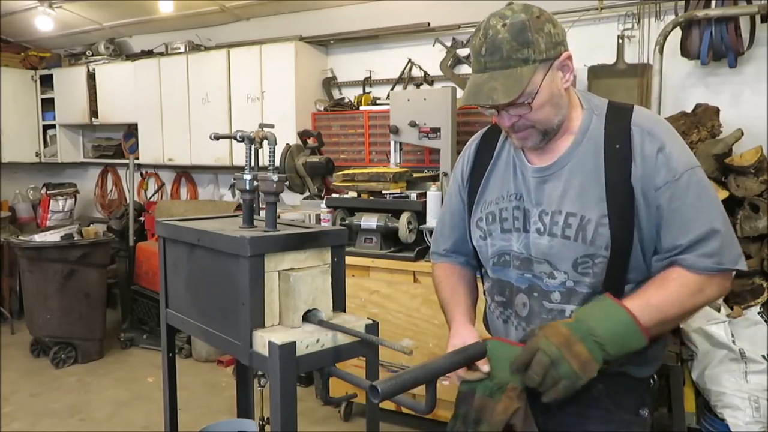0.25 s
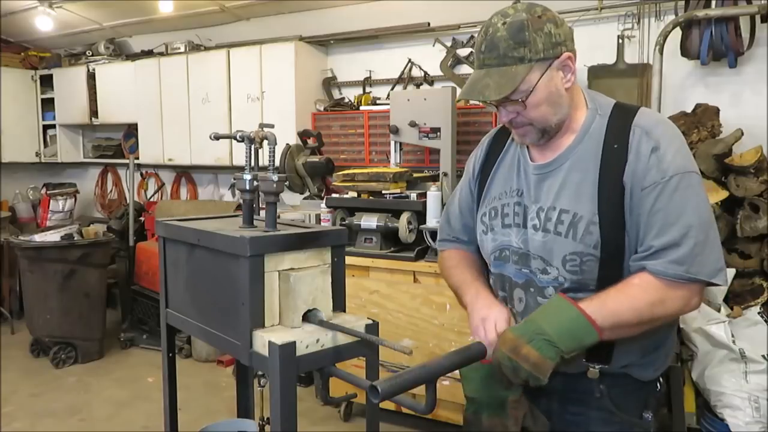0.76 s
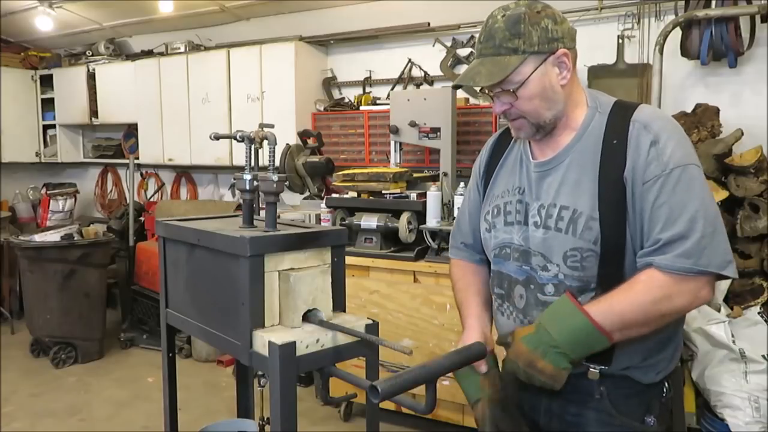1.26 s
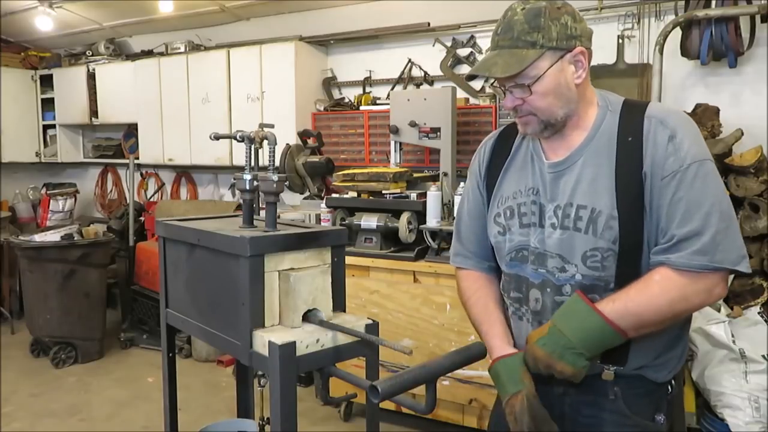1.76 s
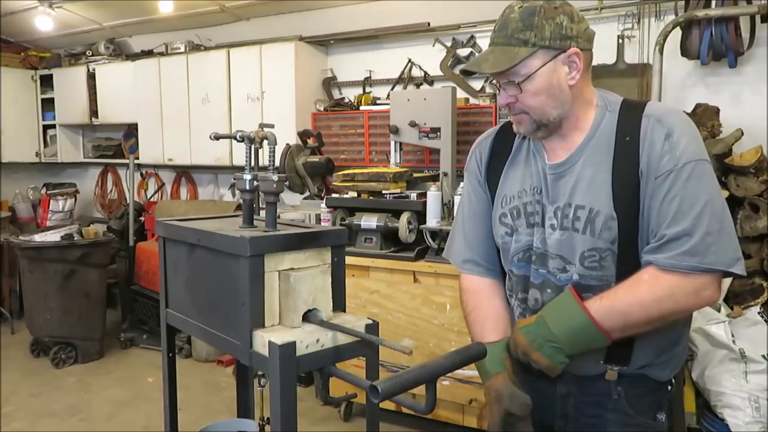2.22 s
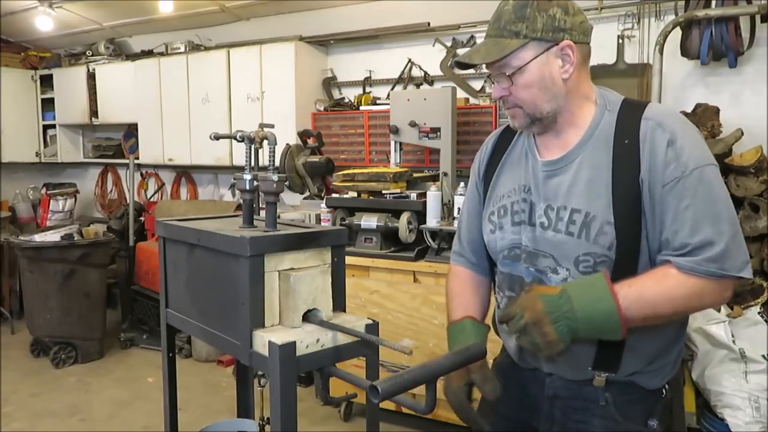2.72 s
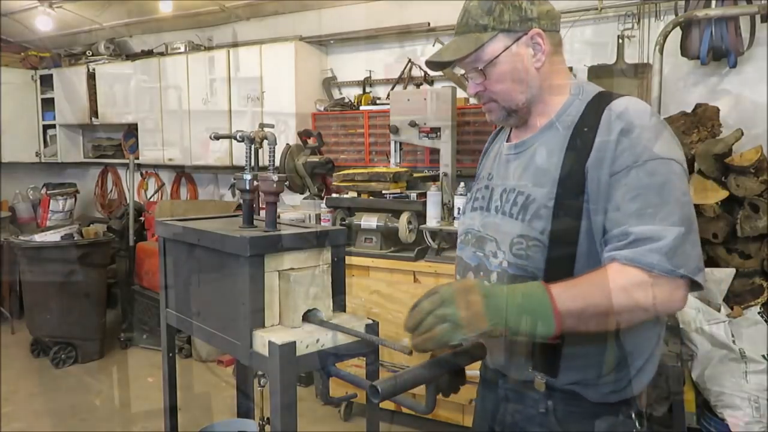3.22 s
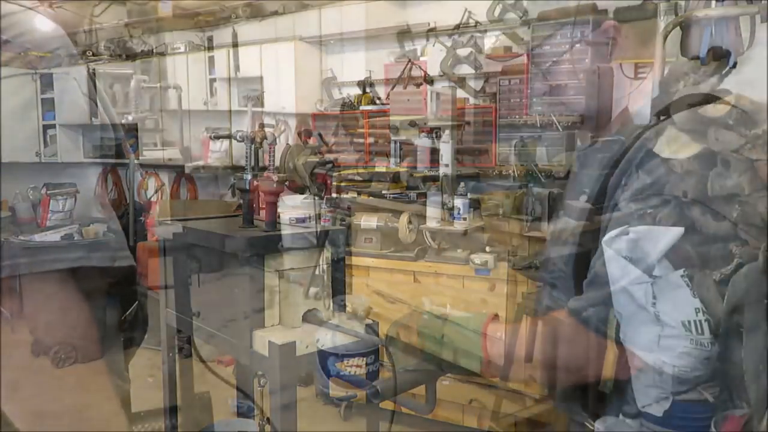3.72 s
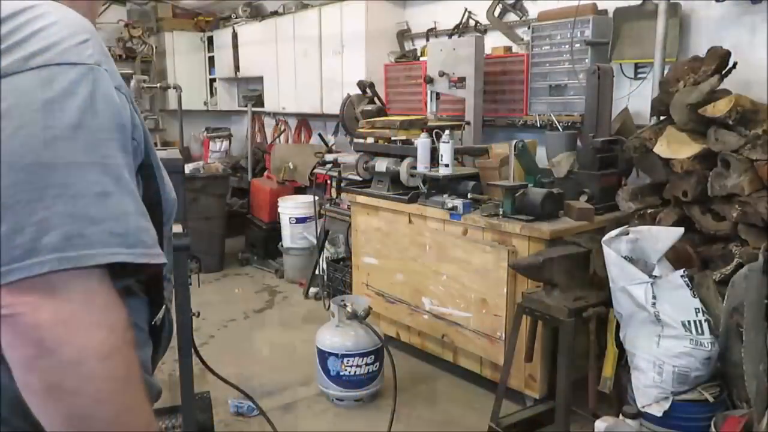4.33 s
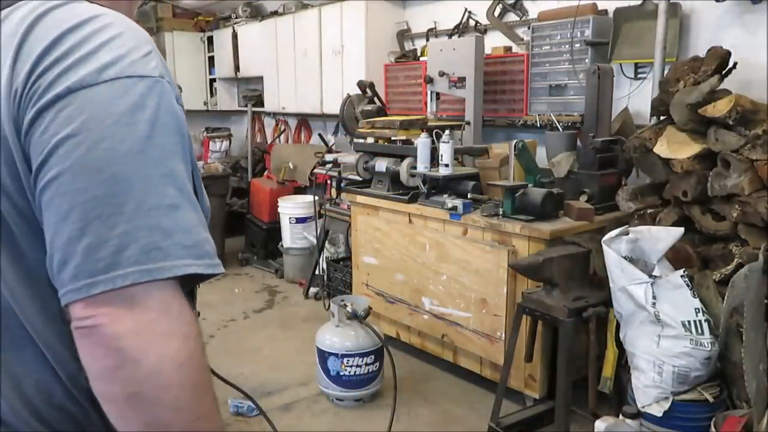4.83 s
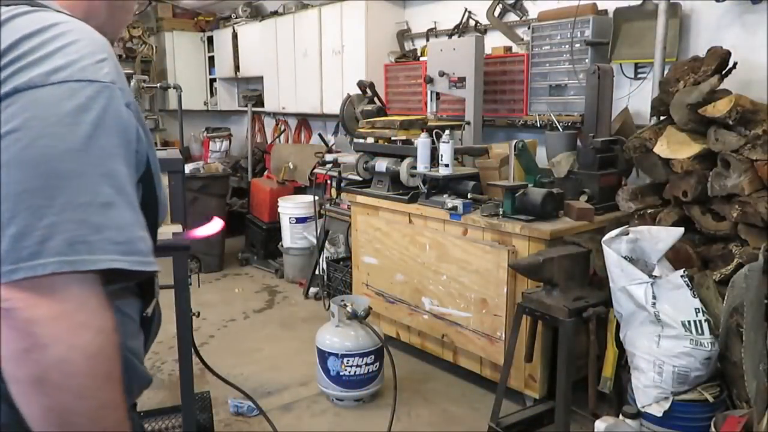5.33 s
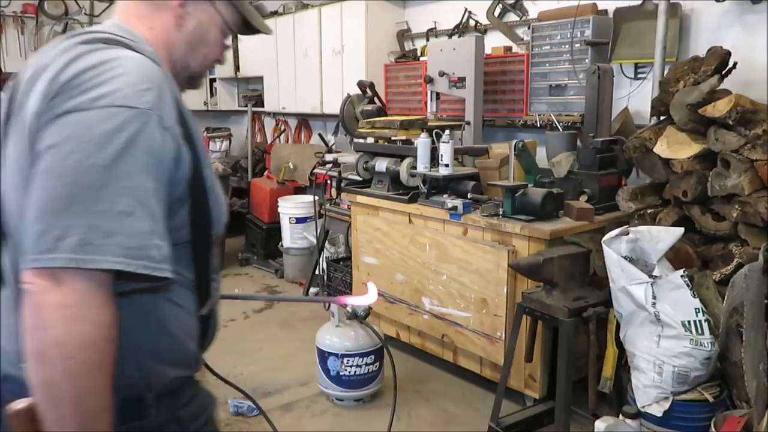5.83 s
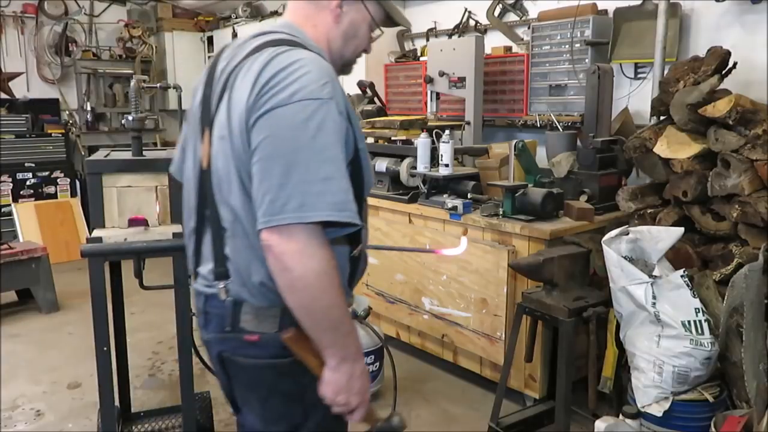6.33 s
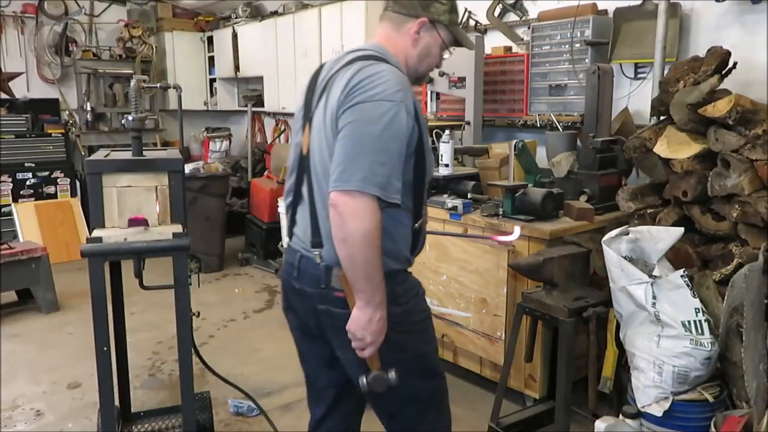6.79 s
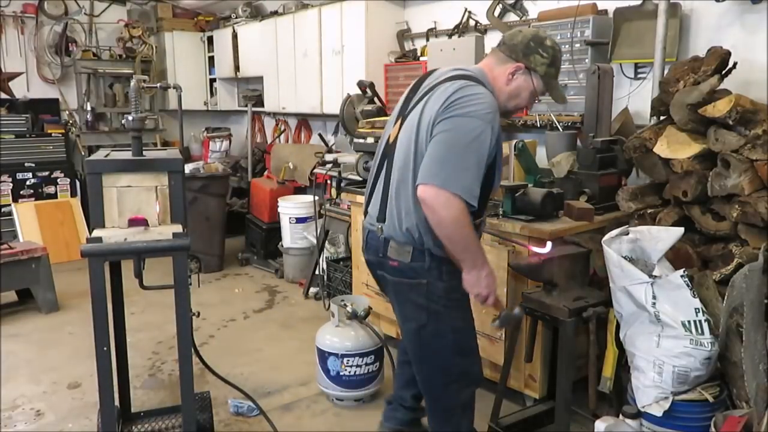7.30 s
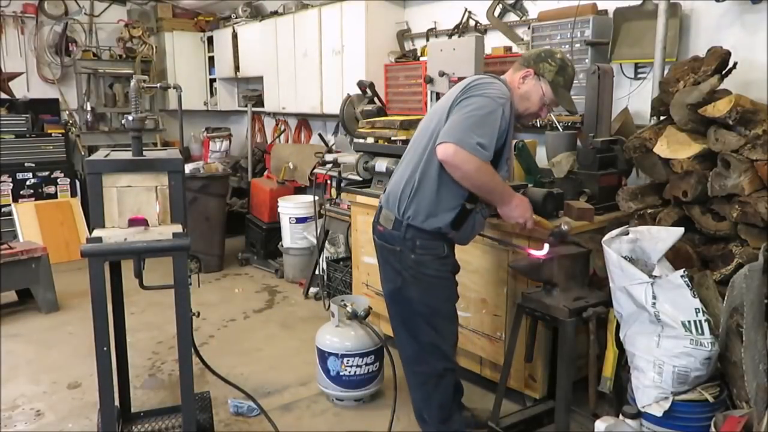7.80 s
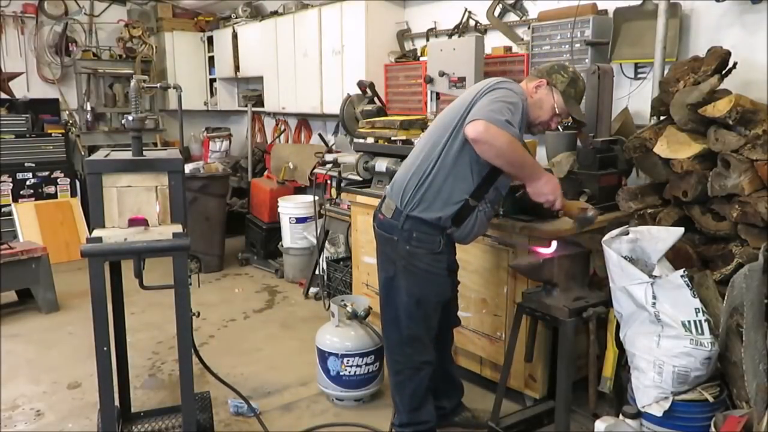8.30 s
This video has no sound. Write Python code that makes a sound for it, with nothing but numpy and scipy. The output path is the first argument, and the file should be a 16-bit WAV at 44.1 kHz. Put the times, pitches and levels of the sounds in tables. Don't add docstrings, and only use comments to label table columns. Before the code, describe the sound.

From 0 s a gas forge roars at full, steady strength in a workshop, heard by a small near-mono microphone with wider treble. With the door shut, a deep hollow boom around 200-300 Hz throbs in quick irregular flares, over bass rumble, dull burner-tube whistling and a thin high gas hiss that flutters in short puffs. At about 3.03 s a second view enters abruptly: the open chamber's broader, breathier roar, layered over the first. At 4.53 s the shut-door sound cuts out, taking its fine high hiss with it. The open flame continues to the end, rough and low-heavy, with faint wavering whistles and small changes in strength and brightness as a body passes. Around 7.5 s a bar touches metal, barely audible. Near 8.47 s comes a tiny tick, then at 8.49 s one hammer blow with an immediate bounce: a short, damped metallic crack, ending the scene.

```python
import sys
import numpy as np
from scipy import signal
from scipy.fft import rfft, irfft, next_fast_len
from scipy.io import wavfile
from scipy.ndimage import uniform_filter1d, minimum_filter1d, map_coordinates

SR = 44100
rng = np.random.default_rng(int(sys.argv[2]) if len(sys.argv) > 2 else 0)


def int16_out(signal):
    q = np.round(np.clip(np.atleast_2d(signal).T, -1, 1) * 32767)
    wavfile.write(sys.argv[1], SR, q.astype(np.int16))


def voltage_ratio(decibels):
    exponent = np.asarray(decibels, float) / 20
    return 10 ** exponent


N = 377055
PAD = next_fast_len(N + 8192)
HZ = np.maximum(np.arange(PAD // 2 + 1) * SR / PAD, 1)
LOG_HZ = np.log(HZ)
PUFF_REST_DB = -66.5

# start_s, roar_db, view_db (brightness through a clear mouth)
OPEN_FLAME = [(3.05, -33.5, 0.1), (3.56, -28, -0.5), (3.59, -33, 0.5), (4.33, -29.5, -0.4),
              (4.48, -33, 0.1), (5.2, -29, 0.4), (5.23, -32.5, 0.8), (5.29, -29, -0.2), (5.54, -33, 0),
              (6.12, -32, 0.9), (6.4, -27.5, -0.4), (6.91, -32, 0.9), (6.99, -34, 0.5), (7.16, -32.5, 0.1),
              (7.46, -31.5, 1), (7.7, -29.5, -0.2), (8.16, -31, 1), (8.45, -29, 0.7)]
# pitch_hz, side_minus_mid_db
SHUT_WIDTH = [(60, -44), (110, -59), (200, -33.5), (380, -30), (700, -31.5), (1290, -23), (2380, -21),
              (4400, -10.5), (8120, -4), (15000, 4.5)]
# pitch_hz, side_minus_mid_db
OPEN_WIDTH = [(60, -33.5), (110, -45.5), (200, -36), (380, -23.5), (700, -26), (1290, -20.5), (2380, -14),
              (4400, -8.5), (8120, -1), (15000, 6)]


def rms_one(x):
    return x / np.sqrt(np.mean(x ** 2) + 1e-20)


def in_time(rows):
    s, *columns = np.transpose(rows)
    return [np.interp(np.arange(N) / SR, s, c) for c in columns]


def slope(points):
    hz, db = np.transpose(points)
    return voltage_ratio(np.interp(LOG_HZ, np.log(hz), db))


def peaks(modes, order=1):
    power = sum(voltage_ratio(2 * db) / (1 + (2 * (HZ - hz) / width) ** 2) ** order for hz, width, db in modes)
    return np.sqrt(power)


def drift(rate_hz):
    knots = rng.standard_normal(400)
    return map_coordinates(knots, [np.arange(N) * min(rate_hz, 40) / SR], order=3)


def noise(gain, side):
    chance = rng.standard_normal((2, len(HZ), 2)) @ [1, 1j]
    mid, apart = irfft(chance * gain * [np.ones_like(HZ), slope(side)], PAD)[:, :N]
    return np.array([mid + apart, mid - apart]) / np.std(mid)


def evened(x, seconds):
    size = int(seconds * SR)
    power = uniform_filter1d(uniform_filter1d(np.mean(x ** 2, axis=0), size), size)
    return rms_one(x / np.sqrt(power + .02))


def swells(rows, rest_db, attack_s, release_s):
    t, out = np.arange(N) / SR, np.zeros(N)
    for s, length, db in rows:
        begin, end = s - attack_s, s + length + release_s
        near = slice(max(int(begin * SR), 0), int(end * SR))
        out[near] += (db - rest_db) * np.interp(t[near], [begin, s, s + length, end], [0, 1, 1, 0])
    return out


def workshop(depth):
    t = np.arange(SR // 4) / SR
    scatter = rng.standard_normal(len(t)) * voltage_ratio(-60 * t / .5) * (t > .02)
    echoes = depth * rms_one(scatter) / np.sqrt(len(t))
    echoes[0] = 1
    return np.abs(rfft(echoes, PAD))


def firebox(chamber, low, side, levels_db, drive_db):
    # pitch_hz, width_hz, level_db
    room_modes = [(78, 8.3, 8.5), (117.7, 5.4, 4), (157.3, 18, 6)]
    # start_s, length_s, level_db
    flares = [(0.045, 0.046, -11.5), (0.26, 0.05, -12), (0.874, 0.048, -9.5), (1.421, 0.016, -7.5),
              (1.722, 0.077, -12.5), (2.363, 0.016, -11.5), (2.613, 0.034, -10), (2.972, 0.13, -12.5),
              (3.133, 0.058, -11), (3.333, 0.037, -9.5), (3.401, 0.022, -11.5), (3.477, 0.12, -12),
              (3.672, 0.016, -8.5), (3.82, 0.025, -15), (3.953, 0.092, -11), (4.134, 0.052, -15.5),
              (4.207, 0.17, -14), (4.417, 0.032, -15.5), (4.489, 0.026, -14.5), (4.688, 0.126, -10.5),
              (5.317, 0.056, -11.5), (5.384, 0.021, -8.5), (6.497, 0.042, -11.5), (6.879, 0.046, -11),
              (7.183, 0.049, -11.5), (7.432, 0.051, -10.5), (7.848, 0.042, -10), (8.203, 0.037, -11.5),
              (8.48, 0.019, -11)]
    # start_s, length_s, depth_db
    lulls = [(1.17, .03, -7.5), (1.5, .06, -5), (2.41, 0.071, -6), (2.82, 0.088, -2.5), (4.64, .03, -4),
             (5.5, .05, -2), (6.08, 0.061, -7), (6.97, 0.088, -2.5)]
    attack_s, release_s = 0.011, 0.012
    flame_db = 0.69 * swells(flares, -16, attack_s, release_s) + swells(lulls, 0, attack_s, release_s)
    lower_db, upper_db, rumble_db = levels_db
    lower, upper = chamber
    ringing = noise(peaks(lower, order=2), side) * voltage_ratio(lower_db)
    ringing = ringing + noise(peaks(upper, order=2), side) * voltage_ratio(upper_db)
    boom = evened(rms_one(ringing), 0.068) * np.std(ringing) * voltage_ratio(flame_db)
    rumble = evened(noise(slope(low) * np.hypot(1, peaks(room_modes)), side), 0.34)
    return boom + rumble * voltage_ratio(rumble_db + drive_db)


def puffs():
    # start_s, length_s, level_db
    spurts = [(0.047, 0.046, -61.5), (0.12, 0.15, -58), (0.317, 0.1, -57.5), (0.421, 0.046, -65),
              (0.496, 0.058, -62), (0.608, 0.032, -61.5), (0.76, 0.082, -62), (0.867, 0.058, -59.5),
              (0.958, 0.054, -59.5), (1.154, 0.032, -60), (1.279, 0.034, -63.5), (1.326, 0.088, -58.5),
              (1.429, 0.064, -57.5), (1.706, 0.086, -59.5), (1.796, 0.11, -59), (2.172, 0.036, -62.5),
              (2.214, 0.084, -60.5), (2.344, 0.059, -60.5), (2.517, 0.04, -60), (2.61, 0.042, -58.5),
              (2.692, 0.068, -58.5), (2.968, 0.04, -61.5)]
    inset_s = .014
    held = [(s + inset_s, max(length - 2 * inset_s, .002), db) for s, length, db in spurts]
    return swells(held, PUFF_REST_DB, attack_s=0.024, release_s=.03)


def shut_forge():
    # pitch_hz, level_db (per Hz)
    hiss_slope = [(180, -35), (310, -33), (331, -6.5), (565, -27), (857, -24.5), (1080, -28.5), (1520, -25),
                  (1760, -26), (2310, -29), (2670, -30.5), (3200, -33.5), (3510, -33.5), (7000, -45.5),
                  (9100, -90.5), (15400, -120)]
    # pitch_hz, width_hz, level_db
    tubes = [(369, 7.7, 5), (413, 6.7, -1), (503, 15, 0.5), (503, 7.8, 6.5), (620, 27, 3), (692, 8.8, -3.5),
             (826, 81, 5.5),
             (1779, 45, 11), (1990, 30, 6), (2089, 30, 5), (2590, 40, 5.5), (2819, 40, 7),
                  (3400, 60, 4), (3562, 55, 8), (4160, 90, 6), (4570, 100, 6), (5210, 60, 5)]
    # pitch_hz, level_db (per Hz)
    jet_slope = [(3240, -28.5), (5500, 5.5), (7110, -1), (8760, 1.5), (9310, -5.5), (9930, -10.5),
                 (11400, -19), (12600, -13), (14200, -10), (15500, -22.5)]
    # pitch_hz, level_db (per Hz)
    flutter_slope = [(3500, -22), (6000, -9), (8600, -7), (9300, -2), (10000, 0), (11200, -9), (13000, -13),
                     (15500, -22)]
    # pitch_hz, width_hz, level_db
    jet_tones = [(5950, 70, 4), (6280, 50, 4), (7460, 50, 4), (9620, 70, 8), (10020, 45, 6),
                 (10830, 120, 4), (11870, 60, 4), (12110, 50, 7), (12470, 50, 5), (13010, 40, 5)]
    hiss_db = -45.5 + 0.25 * puffs() + 0.25 * drift(2.8)
    flutter_db = PUFF_REST_DB + puffs() + 1.5 + 2.4 * drift(38)
    room = workshop(1.0)
    colour = slope(hiss_slope) * room * np.hypot(1, peaks(tubes))
    hiss = voltage_ratio(hiss_db) * noise(colour * (HZ > 700), SHUT_WIDTH)
    skirt = voltage_ratio(-33.5) * noise(colour * (HZ <= 700), SHUT_WIDTH)
    nozzle = room * np.hypot(1, peaks(jet_tones))
    steady = voltage_ratio(-64.5) * noise(slope(jet_slope) * nozzle, SHUT_WIDTH)
    flutter = voltage_ratio(flutter_db) * noise(slope(flutter_slope) * nozzle, SHUT_WIDTH)
    return hiss + skirt + steady + flutter


def open_forge():
    # pitch_hz, level_db (per Hz)
    roar_slope = [(180, -28), (310, 5), (430, -14), (607, -16.5), (802, -22), (1400, -24.5), (1700, -24.5),
                  (3120, -29), (3390, -33.5), (3740, -35.5), (4060, -33), (11600, -52), (13600, -59.5),
                  (15500, -78)]
    # pitch_hz, width_hz, level_db
    mouth_modes = [(381, 32, 5), (411, 12, 4), (471, 5.6, 3), (715, 51, 3), (1030, 11, 0), (1351, 100, 3),
                   (1840, 20, 3.5), (2199, 17, 5.5), (2460, 27, -1.5), (2860, 82, -1.5), (3665, 130, 6),
                   (4520, 120, -4.5)]
    # pitch_hz, width_hz, level_db
    whistle_modes = [(621, 11, 0), (846, 11, -4), (1581, 11, -7), (3161, 16, -11), (3618, 16, -16)]
    roar_db, view_db = in_time(OPEN_FLAME)
    bright_db = -8.5 + view_db
    colour = slope(roar_slope) * workshop(0.31) * np.hypot(1, peaks(mouth_modes))
    above = 1 / (1 + (2000 / HZ) ** 4)
    body = noise(colour * np.sqrt(1 - above) * (HZ > 440), OPEN_WIDTH) * voltage_ratio(roar_db + 0.59 * drift(7.9))
    skirt = noise(colour * (HZ <= 440), OPEN_WIDTH) * voltage_ratio(roar_db + 6.5)
    whistles = noise(peaks(whistle_modes, order=2), OPEN_WIDTH) * voltage_ratio(-26 + .5 * roar_db + 1.5 * drift(6))
    top = noise(colour * np.sqrt(above), OPEN_WIDTH) * voltage_ratio(roar_db + bright_db + 0.58 * drift(24))
    return body + skirt + whistles + top


def hammer():
    # start_s, level_db, contact_cutoff_hz
    blows = [
        (7.5105, -40, 3500),
        (8.4700, -32, 3300),
        (8.4945, -30, 13000),
        (8.4990, -31, 5500),
    ]
    # pitch_hz, level_db, t60_s
    steel = [(1250, 0, .08), (1870, -4, .06), (2406, -2.5, .12), (2690, -7, .1), (2950, -5, .04),
             (3620, 0, .06), (3710, -5, .13), (4060, 3, .04), (4445, -2.5, .15), (4620, -6, .06),
             (6600, -10, .03), (7500, -12, .04), (8400, -11, .03), (10300, -14, .04), (11380, -12, .05)]
    out = np.zeros((2, N))
    for s, db, cut_hz in blows:
        at = round(s * SR)
        t = np.arange(N - at) / SR
        rings = sum(voltage_ratio(mode_db - 60 * t / t60) * np.sin(2 * np.pi * hz * t) / np.hypot(1, (hz / cut_hz) ** 3)
                    for hz, mode_db, t60 in steel)
        band = signal.butter(2, [1100, min(cut_hz, 5200)], "band", fs=SR, output="sos")
        mid, apart = signal.sosfilt(band, rng.standard_normal((2, len(t))))
        dying = voltage_ratio(5 - 60 * t / .045) + voltage_ratio(-5 - 60 * t / .4)
        crack = (mid + .4 * apart * [[1], [-1]]) * dying
        out[:, at:] += voltage_ratio(db) * (1 - np.exp(-t / .0015)) * (rings + crack)
    return out


def microphone(x, lean):
    low_cut = 1 / np.sqrt(1 + (48 / HZ) ** 6)
    return irfft(rfft(x, PAD) * low_cut * np.sqrt(slope(lean)) ** [[1], [-1]], PAD)[:, :N]


def cut(x, at_s, swing, keep):
    height, hz, t60 = swing
    at = round(at_s * SR)
    t = keep * (np.arange(N) - at) / SR
    tone = np.cos(2 * np.pi * hz * t) * voltage_ratio(-60 * np.abs(t) / t60)
    return (x + (height * voltage_ratio([[.4], [-.4]]) - x[:, at:at + 1]) * tone) * (t >= 0)


def shut_view(share):
    # pitch_hz, width_hz, level_db
    chamber = [
        [(203.6, 7.2, -4), (237.1, 29, -0.5), (250.2, 9.4, -0.5)],
        [(269.9, 22.4, -1.5), (301, 24, -21.5)],
    ]
    # pitch_hz, level_db (per Hz)
    rumble_slope = [(18, -80.5), (30, -45), (37, -53.5), (45, -33), (54, -25.5), (113, -19), (143, -7.5),
                    (188, -8.5), (200, 0.5), (260, -24), (440, -120)]
    # pitch_hz, left_minus_right_db
    lean = [(60, 0.092), (110, 0.0), (200, 0.0), (380, 0.5), (700, 0.036), (1290, 0.067), (2380, 0.5),
            (4400, 0.5), (8120, 0.61), (15000, 0.5)]
    levels_db = -17.5, -17.5, -26.5
    boom = firebox(chamber, rumble_slope, SHUT_WIDTH, levels_db, .3 * puffs())
    return microphone(share * boom + shut_forge(), lean)


def open_view(share):
    # pitch_hz, width_hz, level_db
    chamber = [
        [(212, 7.5, -8), (240.1, 44.4, 0)],
        [(266.7, 13, -2), (280.1, 13, 4.5), (308.2, 9, -11.5)],
    ]
    # pitch_hz, level_db (per Hz)
    rumble_slope = [(18, -48), (30, -21.5), (37, -22.5), (46, -25.5), (60, -7), (92, -8.5), (118, 1.5),
                    (146, -2.5), (183, 0), (200, 2.5), (260, -27), (440, -120)]
    # pitch_hz, left_minus_right_db
    lean = [(60, 0.0), (110, 0.0), (200, 0.32), (380, 0.5), (700, 0.0), (1290, -0.5), (2380, -0.5),
            (4400, -0.5), (8120, -0.5), (15000, 0.0)]
    levels_db = -19.5, -17, -29
    roar_db = in_time(OPEN_FLAME)[0]
    boom = firebox(chamber, rumble_slope, OPEN_WIDTH, levels_db, 1.2 * (roar_db - roar_db.mean()))
    return microphone(share * boom + open_forge() + hammer(), lean)


def scene():
    # height, pitch_hz, t60_s
    swings = [
        (.4, 250, .05),
        (-.45, 265, .05),
        (.4, 262, .05),
    ]
    second_in_s, first_out_s = 3.0329, 4.5348
    t = np.arange(N) / SR
    share = np.where((t > second_in_s) & (t < first_out_s), voltage_ratio(-1), 1)
    first = cut(shut_view(share), 0, swings[2], keep=0.98)
    first = cut(first, first_out_s, swings[0], keep=-1.1)
    return first + cut(open_view(share), second_in_s, swings[1], keep=0.84)


def top_cut(x):
    return signal.sosfilt(signal.butter(12, 15690, fs=SR, output="sos"), x)


def record(dry):
    room_left = np.minimum(1, .99 / (np.abs(dry).max(axis=0) + 1e-9))
    gain = uniform_filter1d(minimum_filter1d(room_left, size=401), size=201)
    return top_cut(dry * gain)


dry = scene()
out = record(dry)
int16_out(out)
```